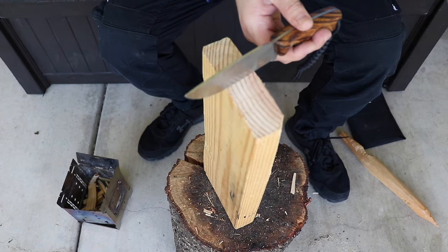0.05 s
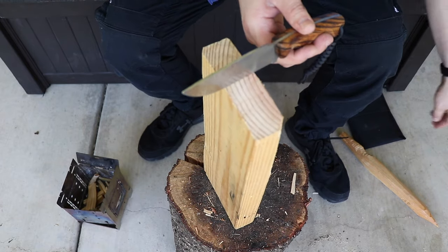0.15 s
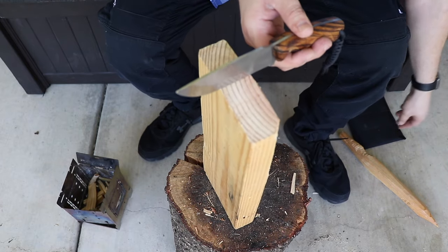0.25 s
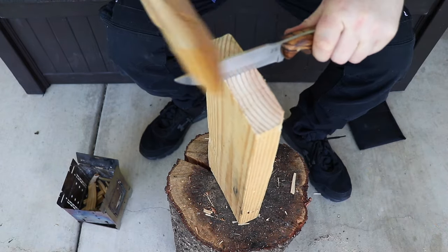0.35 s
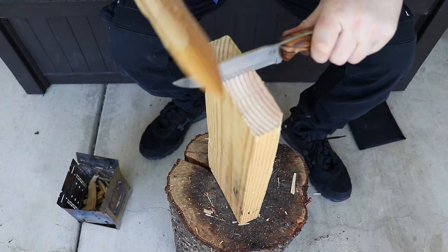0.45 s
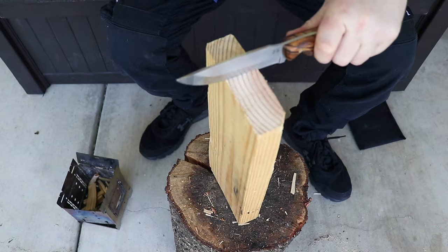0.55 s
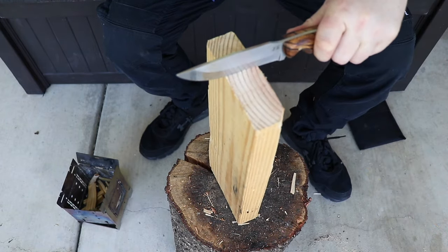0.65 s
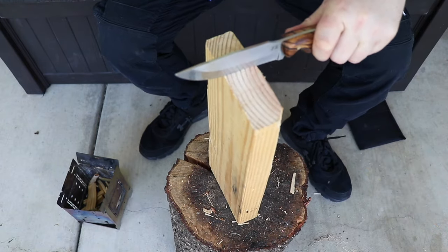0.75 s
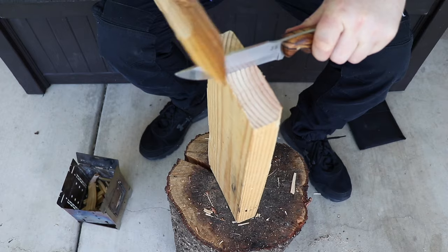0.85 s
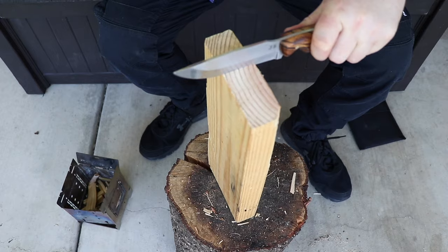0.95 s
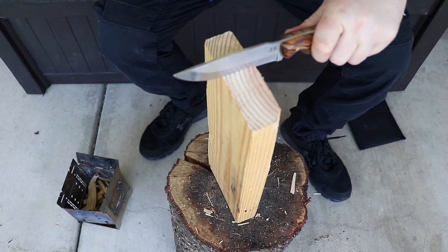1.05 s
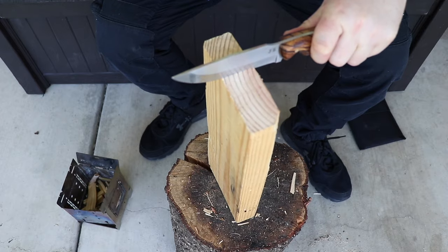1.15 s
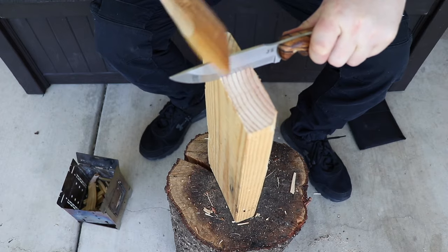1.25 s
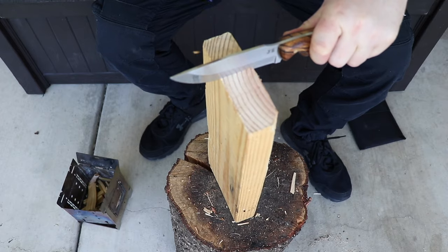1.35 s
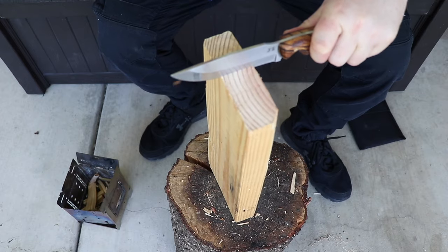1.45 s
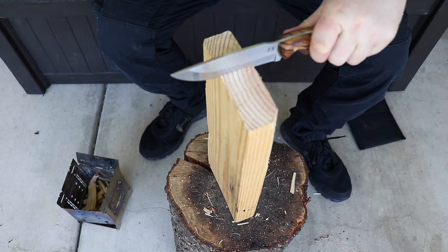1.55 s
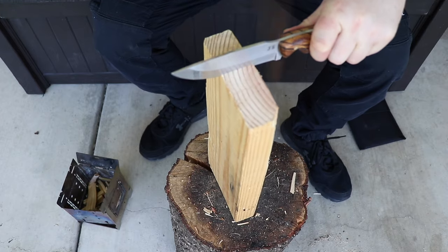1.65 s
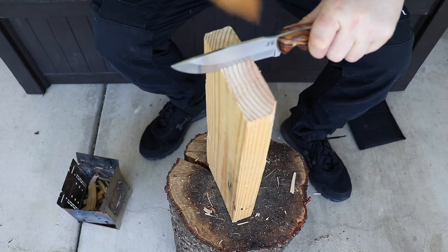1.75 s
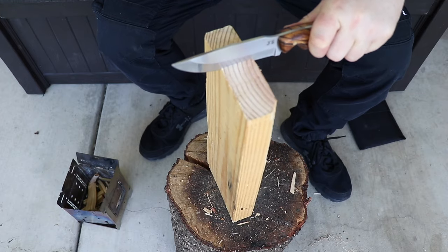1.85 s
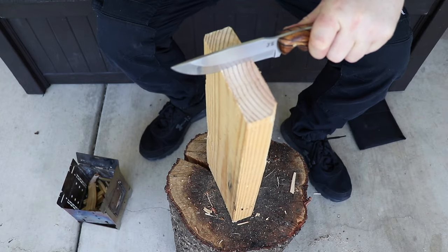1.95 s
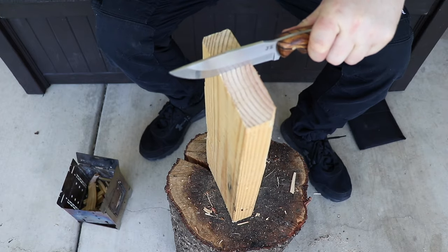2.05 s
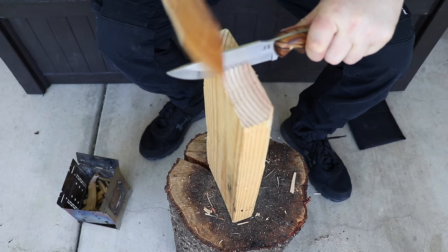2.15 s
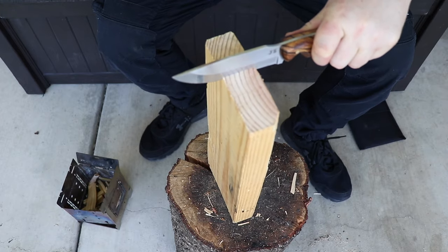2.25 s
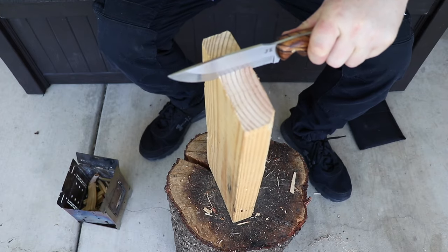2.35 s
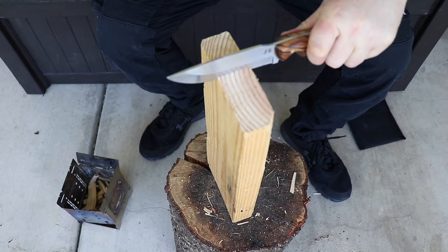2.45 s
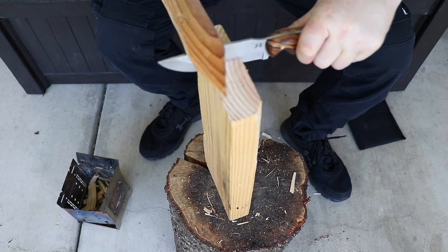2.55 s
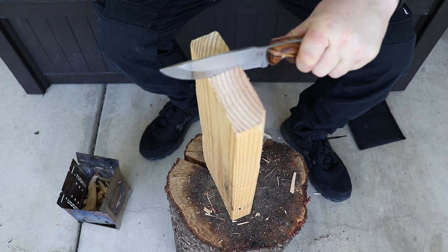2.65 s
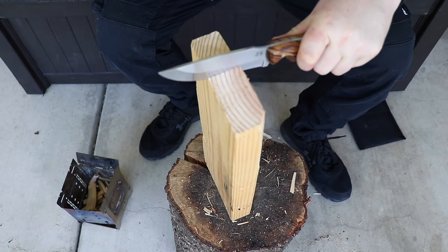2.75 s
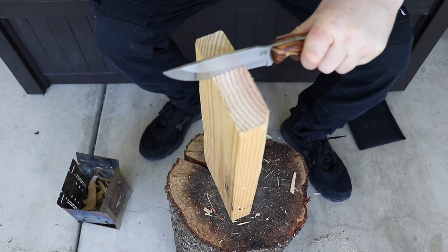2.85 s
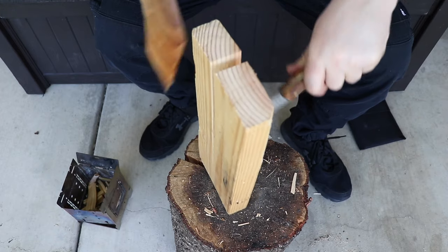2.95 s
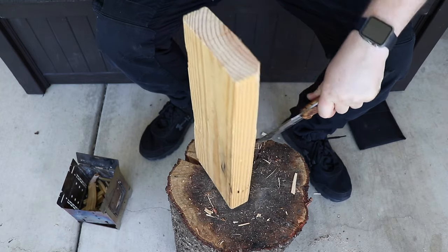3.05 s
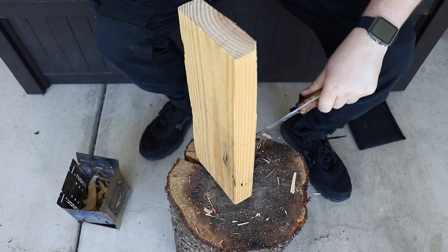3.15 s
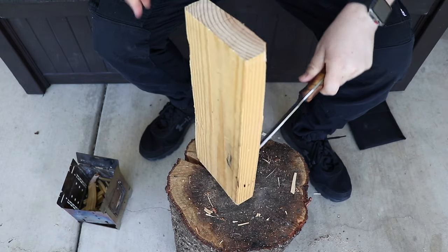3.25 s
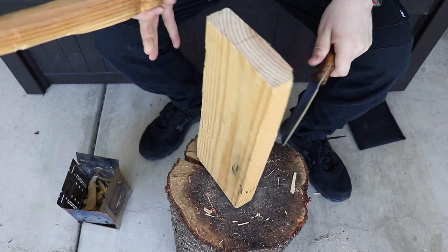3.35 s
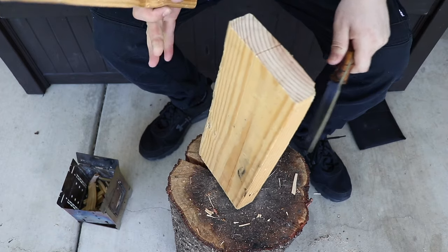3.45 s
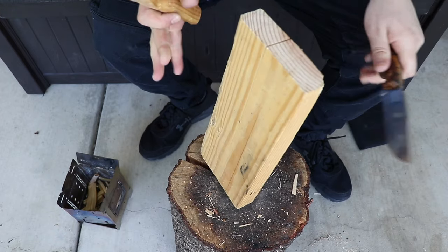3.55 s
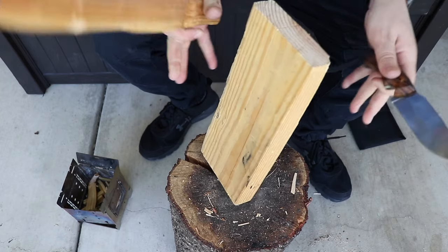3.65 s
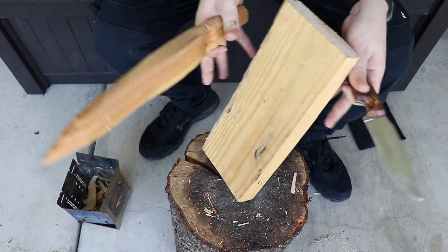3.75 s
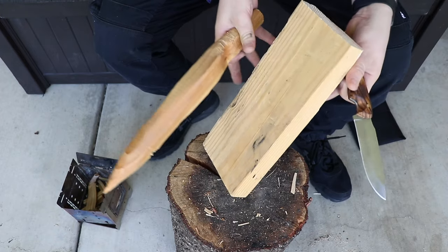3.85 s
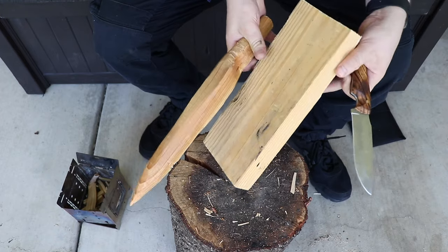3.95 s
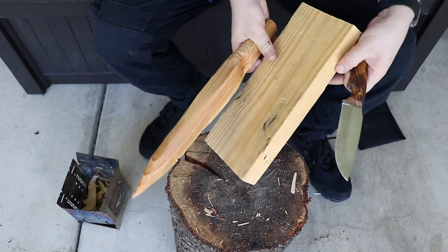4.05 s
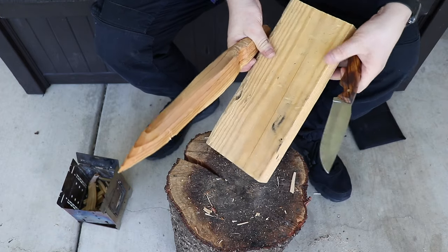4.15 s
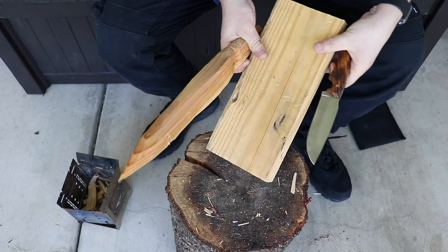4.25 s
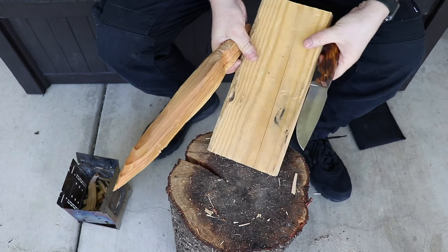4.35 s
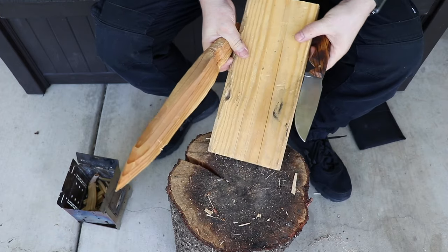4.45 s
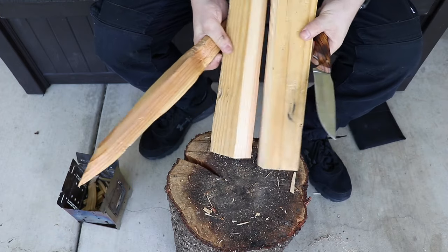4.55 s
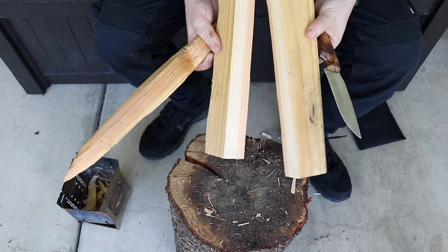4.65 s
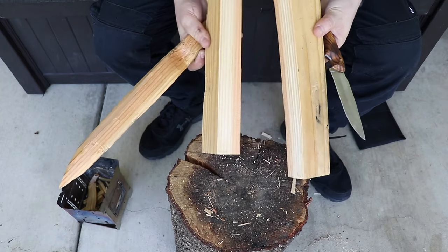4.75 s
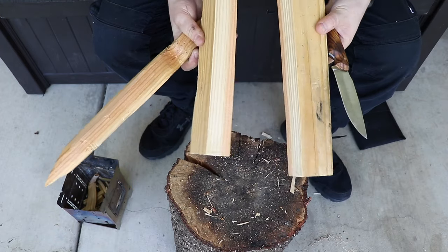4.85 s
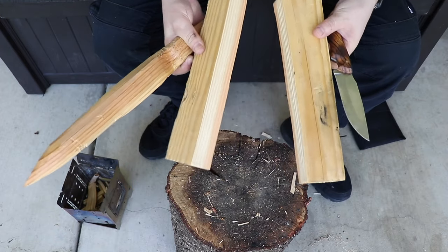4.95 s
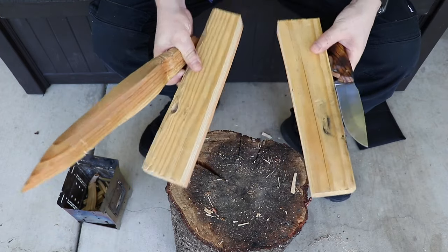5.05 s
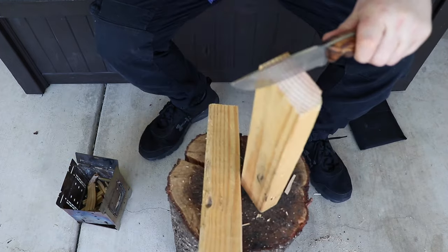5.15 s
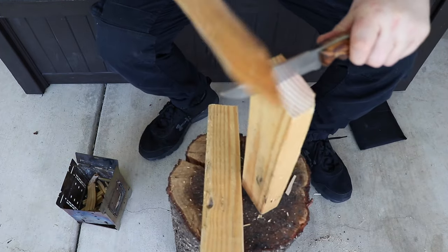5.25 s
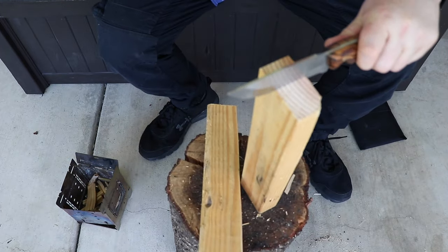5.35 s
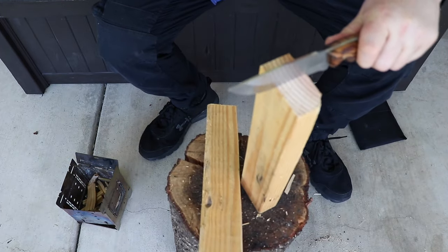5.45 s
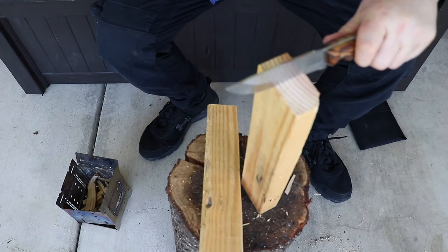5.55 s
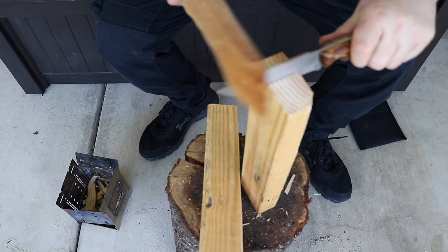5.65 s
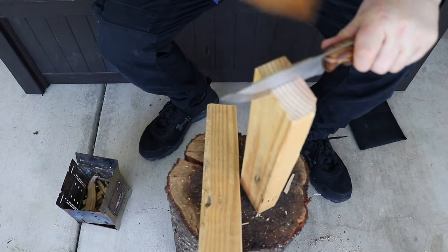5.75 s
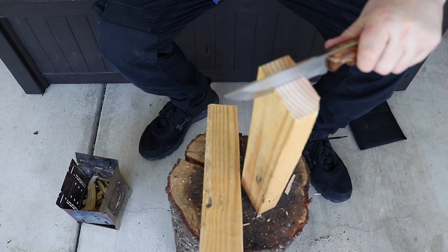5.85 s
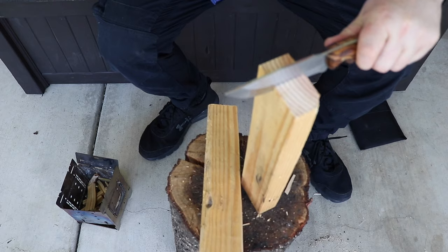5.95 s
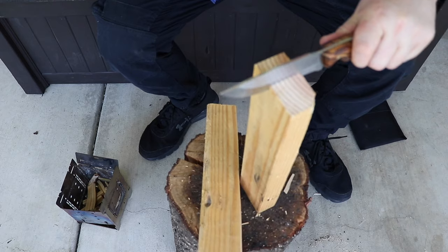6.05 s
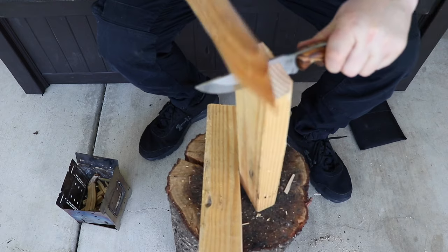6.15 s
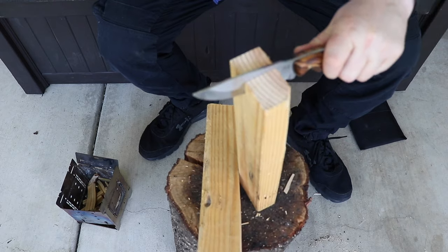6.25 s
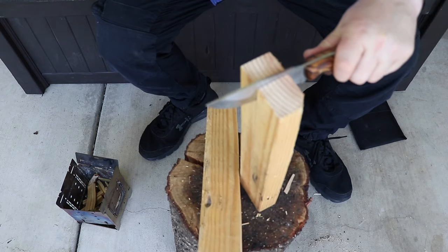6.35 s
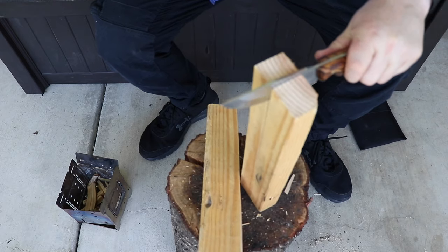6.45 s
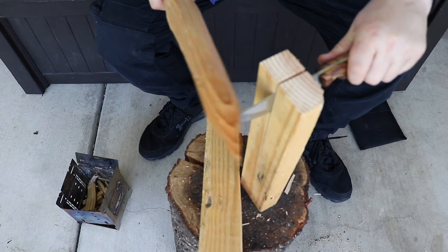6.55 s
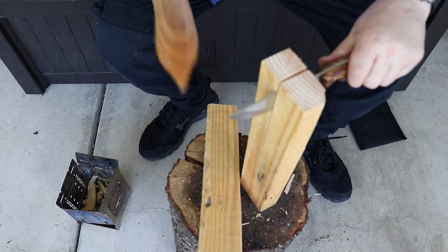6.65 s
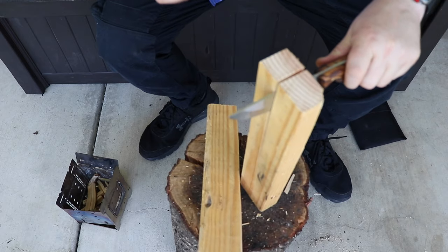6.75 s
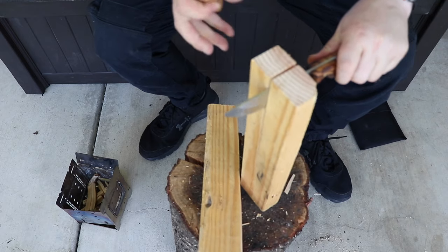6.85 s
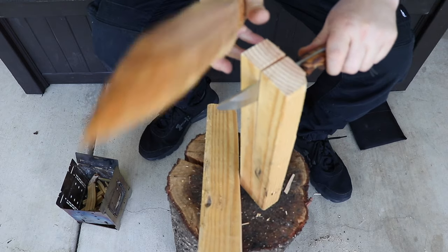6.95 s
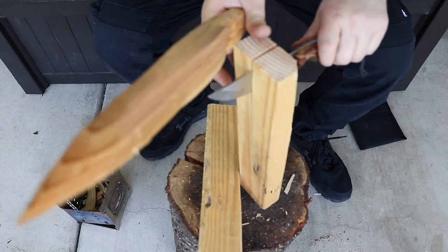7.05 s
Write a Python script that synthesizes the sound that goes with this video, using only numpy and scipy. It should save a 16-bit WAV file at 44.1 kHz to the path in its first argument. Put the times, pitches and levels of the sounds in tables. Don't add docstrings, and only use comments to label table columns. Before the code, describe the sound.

A wooden stick cracks hard against a knife spine in evenly spaced, distorted knocks on a hard-walled porch; a board snaps apart, then knocking resumes.

```python
import sys
import numpy as np
from scipy import signal
from scipy.io import wavfile
from scipy.ndimage import map_coordinates

SR = 44100
rng = np.random.default_rng(int(sys.argv[2]) if len(sys.argv) > 2 else 0)


def natural_amplitude(level_db):
    exponent = np.asarray(level_db, float) / 20
    return 10 ** exponent


def file_out(sig):
    cols = np.atleast_2d(sig).T
    lim = np.clip(cols, -1, 1)
    pcm = np.round(lim * 32767).astype(np.int16)
    wavfile.write(sys.argv[1], SR, pcm)


N = 313551

# (time [s], log level [dB], board level [dB], baton level [dB], blade level [dB])
BLOWS = [(0.377, -7.5, -3, -5.5, -14.5), (0.8365, -4, -0.5, 1, -9), (1.2632, -3, 0, -0.5, -12),
         (1.696, -4.5, 1.5, -3, -12), (2.123, -4.5, 1, -5, -12), (2.538, -6.5, 0, 2.5, -7.5),
         (2.9551, -5.5, -1.5, -3.5, -7.5), (5.2032, -8, -1, 0, -9.5), (5.667, -11, -1, -1.5, -9.5),
         (6.1108, -10.5, -5.5, -5.5, -6.5), (6.5733, -25, -13.5, -12.5, -16)]
# (wood note [Hz], lift [dB], overtone [Hz], lift [dB], second overtone [Hz])
BLOW_NOTES = [(1110, 3, 3100, 6.5, 3500), (2287, 11.5, 4250, 7, 2500), (970, 2.1, 2500, 2, 2200),
              (1920, 4.9, 6500, 4.5, 3700), (1900, 7, 3600, 8, 11000), (2300, 1.5, 7000, 2.5, 3000),
              (800, 5, 5900, 7, 1900), (1650, 1, 4750, 9, 7700), (2150, 1.9, 4600, 7.5, 8400),
              (1450, 6, 3400, 6.5, 3050), (1400, 7, 2280, 8.5, 6500)]
PUSHES = [0.11, .12, -2.4, 0.52, 0.4, 0.19, 1.1, 2.3, 0.54, -0.43, .02]
# (frequency [Hz], level [dB], t60 [s])
LOG_MODES = [(166, -3, .03), (252, -1, 0.014), (389, 3, 0.032), (492, -0.5, 0.021)]
# (frequency [Hz], level [dB], t60 [s])
BOARD_MODES = [(615, 0.5, 0.012), (783, 0.5, 0.02), (1023, 4, 0.012), (1302, 4, .015), (1480, 6.5, 0.011)]
# (frequency [Hz], level [dB], t60 [s])
BATON_MODES = [(1639.6, 6, .015), (1889, 8.5, 0.0093), (2338, 6, 0.0085), (2684, 0, 0.014),
               (3094, -0.5, 0.013), (3500, -5.5, 0.0082)]
# (frequency [Hz], level [dB], t60 [s])
BLADE_MODES = [(3860, 3, 0.0075), (4321, 1, 0.02), (4746, 2.5, 0.011), (5745, -5, 0.0036),
               (6500, -6, 0.018), (7200, -4, 0.006), (8340, 1, 0.0052), (11700, -3.5, 0.0022)]


def blows(crack_db=22, crack_hz=3000, push_hz=80, push_t60_s=0.024):
    knocks, crack, shove = np.zeros((3, N))
    t = np.arange(SR // 8) / SR
    no_bass = signal.butter(2, 350, "high", fs=SR, output="sos")
    click = signal.lfilter(*signal.butter(1, [400, crack_hz], "band", fs=SR), t == 0)
    for (time_s, log_db, *body_db), notes, push in zip(BLOWS, BLOW_NOTES, PUSHES):
        at = round(time_s * SR)
        modes = []
        for body, level_db in zip((BOARD_MODES, BATON_MODES, BLADE_MODES), body_db):
            modes += [(hz, level_db + db, t60_s) for hz, db, t60_s in body]
        upper = signal.sosfilt(no_bass, struck(modes, t, spread_db=1.2))
        log = natural_amplitude(log_db) * struck(LOG_MODES, t, spread_db=2.0)
        knocks[at:][:len(t)] += noted(upper, *notes) + log
        click_db = crack_db + (body_db[1] + body_db[2]) / 2
        crack[at:][:len(t)] += natural_amplitude(click_db) * noted(click, *notes)
        shove[at] = push
    return knocks, crack, ring(shove, push_hz, push_t60_s)


def struck(modes, t, spread_db):
    hz, db, t60_s = np.transpose(modes)[:, :, None]
    sign = (-1.) ** np.arange(len(hz))[:, None]
    luck = sign * natural_amplitude(spread_db * rng.standard_normal(hz.shape))
    return (luck * natural_amplitude(db - 60 * t / t60_s) * np.sin(2 * np.pi * hz * t)).sum(axis=0)


def noted(x, note_hz, note_db, over_hz, over_db, second_hz):
    overtone_wide = .11
    x = favour(x, note_hz, 180, note_db)
    x = favour(x, over_hz, overtone_wide * over_hz, over_db)
    return favour(x, second_hz, overtone_wide * second_hz, 3.5)


def favour(x, hz, width_hz, lift_db):
    r = np.exp(-np.pi * width_hz / SR)
    poles = [1, -2 * r * np.cos(2 * np.pi * hz / SR), r * r]
    peak = signal.lfilter((1 - r * r) / 2 * np.array([1, 0, -1]), poles, x)
    return x + (natural_amplitude(lift_db) - 1) * peak


def ring(clicks, hz, t60_s):
    r, w = natural_amplitude(-60 / (t60_s * SR)), 2 * np.pi * hz / SR
    return signal.lfilter([0, np.sin(w)], [1, -2 * r * np.cos(w), r * r], clicks + 1e-18)


# (time [s], peak level [dB], frequency [Hz], t60 [s])
REBOUNDS = [
    (.4018, -1, 1450, .01),
    (3.083, -10.5, 1230, .02),
    (6.5855, -1, 1482, 0.0308),
]


def rebounds():
    return bursts(REBOUNDS, wide=.7)


def bursts(rows, wide):
    out, t = np.zeros(N), np.arange(SR // 4) / SR
    for time_s, peak_db, hz, t60_s in rows:
        width_hz = wide * hz
        edges_hz = max(hz - width_hz / 2, hz / 4), min(hz + width_hz / 2, 16000)
        burst = natural_amplitude(-60 * t / t60_s) * rng.standard_normal(len(t))
        burst[0] = 4.3 * np.sqrt(SR / width_hz)
        burst = signal.sosfilt(signal.butter(2, edges_hz, "band", fs=SR, output="sos"), burst)
        part = out[round(time_s * SR):][:len(t)]
        part += (natural_amplitude(peak_db) * burst / np.abs(burst).max())[:len(part)]
    return out


# (time [s], peak level [dB], frequency [Hz], t60 [s])
TEAR = [
    (4.488, -28.5, 6000, .02),
    (4.505, -40, 2030, 0.022),
    (4.5097, -16, 6600, 0.049),
    (4.5183, 1.5, 6500, 0.0058),
    (4.5340, -1.5, 8000, 0.01),
]


def tear():
    return bursts(TEAR, wide=1.4)


# (time [s], peak level [dB], frequency [Hz], t60 [s])
HALVES = [
    (4.4875, -34.5, 1890, 0.041),
    (4.5095, -22, 1900, 0.061),
    (4.519, -32, 2528, 0.23),
    (4.520, -23.5, 3500, .12),
    (4.520, -32.5, 4000, .08),
    (4.535, -35, 2080, 0.22),
]


def halves():
    return bursts(HALVES, wide=.05)


# (time [s], peak level [dB], frequency [Hz], t60 [s])
ROCKS = [
    (3.288, -37.5, 152, .042),
    (3.381, -29, 385, 0.022),
    (3.388, -33.5, 200, 0.12),
    (3.442, -44, 150, .11),
    (4.117, -48, 703, 0.02),
    (4.512, -28.5, 508, .03),
    (4.518, -31.5, 1400, 0.026),
    (7.086, -38, 600, 0.072),
]


def rocks():
    return bursts(ROCKS, wide=.68)


# (time [s], peak level [dB], frequency [Hz])
FIBRES = [(.280, -45.5, 3010), (1.448, -34.5, 11000), (1.520, -55, 11000), (1.63, -49.5, 5260),
          (2.902, -48.5, 5000), (3.242, -31, 7470), (3.273, -27.5, 7330), (3.321, -38, 7970),
          (3.338, -37, 4490), (3.500, -57, 5000), (3.746, -38, 6500), (3.791, -39, 6500),
          (4.000, -42, 8980), (4.117, -53, 3000), (4.166, -56, 2990), (5.084, -53, 7560),
          (5.462, -54.5, 12000), (6.337, -53.5, 15400), (6.352, -51.5, 15500), (6.501, -48, 5360),
          (6.883, -49, 6930), (6.920, -49, 9240), (7.083, -42.5, 3000)]


def fibres(t60_s=.022):
    return bursts([(*row, t60_s) for row in FIBRES], wide=1.4)


# (time [s], peak level [dB], frequency [Hz])
CREAKS = [(3.243, -43, 2060), (3.273, -45, 2150), (3.748, -46.5, 1994), (3.748, -45, 4070),
          (3.75, -49, 4900), (3.79, -56, 2020), (4.117, -57, 1930), (4.166, -53.5, 1906),
          (4.245, -51, 1894), (4.265, -48.5, 1820), (4.379, -57, 1480), (4.910, -60.5, 1480),
          (5.076, -57, 1830)]


def creaks(t60_s=.15):
    return bursts([(*row, t60_s) for row in CREAKS], wide=.055)


def strain(from_s=3.76, to_s=4.49, hz=1920, t60_s=.013, level_db=-73):
    t = np.arange(N) / SR
    rub = rng.standard_normal(N) * natural_amplitude(5.3 * drift(15)) * (t > from_s) * (t < to_s)
    note = ring(ring(rub, hz, t60_s), hz, t60_s)
    sounding = note[note ** 2 > 1e-6]
    return natural_amplitude(level_db) * note / np.sqrt(np.mean(sounding ** 2))


def drift(rate_hz):
    knots = rng.standard_normal(400)
    return map_coordinates(knots, [np.arange(N) / SR * rate_hz], order=1, mode="wrap")


# (time of peak [s], level [dB], frequency [Hz])
SWISHES = [(.765, -65, 5420), (1.2, -57.5, 7000), (2.068, -63, 5400), (2.499, -59.5, 6000),
           (4.015, -59, 8060), (5.615, -62.5, 7900), (6.058, -61.5, 7870), (6.815, -59, 10000)]


def swishes(half_s=.016, wide=1.3):
    out, t = np.zeros(N), np.arange(N) / SR
    white = rng.standard_normal(N) * natural_amplitude(2.5 * drift(130))
    for time_s, db, hz in SWISHES:
        near = slice(round((time_s - .1) * SR), round((time_s + .1) * SR))
        edges_hz = hz * (1 - wide / 2), min(hz * (1 + wide / 2), 16000)
        hiss = signal.sosfilt(signal.butter(2, edges_hz, "band", fs=SR, output="sos"), white[near])
        puff = np.exp(-((t[near] - time_s) / half_s) ** 2)
        out[near] += natural_amplitude(db) * hiss / np.std(hiss) * puff
    return out


# (time of peak [s], cloth level [dB], shuffle level [dB])
RUSTLE = [(.03, -94, -63), (.29, -57.5, -57), (0.354, -61, -58), (3.52, -85, -69), (3.755, -61.5, -53.5),
          (3.83, -75, -58), (4.012, -80.5, -61.5), (4.08, -78, -74), (4.174, -65, -70), (4.252, -62, -61.5),
          (4.36, -81, -74), (4.914, -64, -80), (5.073, -63, -65), (5.19, -66.5, -61), (7.002, -67, -58.5),
          (7.09, -65, -60.5)]
# (frequency [Hz], density [dB per Hz])
CLOTH = [(500, -29), (900, -11.5), (1600, -2), (1900, 1.5), (2300, -10.5), (4000, -14), (9000, -21.5),
         (15000, -22.5)]
# (low edge [Hz], high edge [Hz])
SHUFFLE_HZ = [90, 600]


def rustle(rise_db_per_s=255, fall_db_per_s=171.5):
    t, cloth_gain, dull_gain = np.arange(N) / SR, np.zeros(N), np.zeros(N)
    for time_s, cloth_db, shuffle_db in RUSTLE:
        swell = natural_amplitude(np.minimum(rise_db_per_s * (t - time_s), fall_db_per_s * (time_s - t)))
        cloth_gain = np.maximum(cloth_gain, natural_amplitude(cloth_db) * swell)
        dull_gain = np.maximum(dull_gain, natural_amplitude(shuffle_db) * swell)
    cloth = cloth_gain * coloured(CLOTH, patchy_db=3, rate_hz=25)
    band = signal.butter(2, SHUFFLE_HZ, "band", fs=SR, output="sos")
    dull = signal.sosfilt(band, rng.standard_normal(N))
    return cloth + dull_gain * natural_amplitude(3 * drift(30)) * dull / np.std(dull)


def coloured(spectrum, patchy_db, rate_hz):
    out = np.zeros(N)
    for hz, band in bands(N):
        out += natural_amplitude(at_hz(spectrum, hz) + patchy_db * drift(rate_hz)) * band
    return out / np.std(out)


def bands(size):
    white = rng.standard_normal((2, size))
    edges_hz = np.append(20 * 2 ** np.arange(0, 10, .5), .45 * SR)
    for k, (low, high) in enumerate(zip(edges_hz, edges_hz[1:])):
        band = signal.butter(2, [low, high], "band", fs=SR, output="sos")
        yield np.sqrt(low * high), signal.sosfilt(band, white[k % 2])


def at_hz(points, hz, column=1):
    points = np.array(points)
    return np.interp(np.log(hz), np.log(points[:, 0]), points[:, column])


# (frequency [Hz], t60 [s], level [dB])
PORCH_TAIL = [(60, 0.36, -9), (163, 0.69, -0.5), (420, 0.49, -3), (1020, 0.41, 0.5), (3000, 0.4, -5),
              (7440, 0.36, -6.5), (12000, 0.21, -6), (16500, 0.26, -5)]


def diffuse(tail_db, build_s=0.0011):
    t, tail = np.arange(SR) / SR, np.zeros(SR)
    for hz, band in bands(SR):
        tail += natural_amplitude(at_hz(PORCH_TAIL, hz, column=2) - 60 * t / at_hz(PORCH_TAIL, hz)) * band
    return natural_amplitude(tail_db) * tail * (1 - np.exp(-(t / build_s) ** 2))


# (frequency [Hz], level [dB], t60 [s])
PORCH_MODES = [(162, -53, .8), (266, -60, .9), (383, -62, .8)]
ECHO_DB = [-11.5, -11.5, -8, -11, -10.5]
ECHO_S = [.0035, .0085, .0125, .0190, .0260]


def porch(x, swell_s=0.032, echo_cut_hz=3000):
    t, standing, echoes = np.arange(SR) / SR, np.zeros(SR), np.zeros(SR)
    for hz, db, t60_s in PORCH_MODES:
        standing += natural_amplitude(db - 60 * t / t60_s) * np.sin(2 * np.pi * hz * t)
    echoes[[round(s * SR) for s in ECHO_S]] = natural_amplitude(ECHO_DB)
    response = diffuse(tail_db=-28.5) + standing * (1 - np.exp(-(t / swell_s) ** 2))
    response += signal.lfilter(*signal.butter(1, echo_cut_hz, fs=SR), echoes)
    return signal.fftconvolve(x, response)[:N]


# (frequency [Hz], density [dB per Hz])
HUM = [(13, -36.5), (25, -6), (64, 5.5), (160, -4.5), (330, -7.5), (1300, -18.5), (3000, -26),
       (15000, -34.5)]
# (frequency [Hz], level [dB])
HUM_LINES = [(70, -79), (240, -68)]


def outdoors():
    white = rng.standard_normal(N)
    out = natural_amplitude(-58) * coloured(HUM, patchy_db=4.0, rate_hz=2.7)
    for hz, db in HUM_LINES:
        tone = ring(white, hz, 0.26)
        out += natural_amplitude(db) * tone / np.std(tone)
    return out


def scene():
    knocks, crack, push = blows()
    ticks = rebounds() + tear() + halves() + rocks() + fibres() + creaks()
    walls = porch(natural_amplitude(-3.0) * knocks + natural_amplitude(-7.5) * ticks)
    walls += signal.fftconvolve(crack, diffuse(tail_db=-24))[:N]
    near = natural_amplitude(6.0) * knocks + natural_amplitude(-9.5) * crack + ticks + walls
    thin = signal.sosfilt(signal.butter(2, 110, "high", fs=SR, output="sos"), near)
    return (thin + push + strain() + swishes() + rustle() + outdoors())[None]


def band_limit(x):
    return signal.sosfilt(signal.butter(12, 16440, fs=SR, output="sos"), x)


def record(dry):
    cut = signal.sosfilt(signal.cheby2(18, 40, 16000, fs=SR, output="sos"), dry)
    clipped = np.clip(cut, -1, 1)
    mix = signal.lfilter(*signal.butter(1, 22, "high", fs=SR), clipped)
    mix = signal.lfilter(*signal.butter(3, 16500, fs=SR), mix)
    return band_limit(mix)


dry = scene()
out = record(dry)
file_out(out)
```